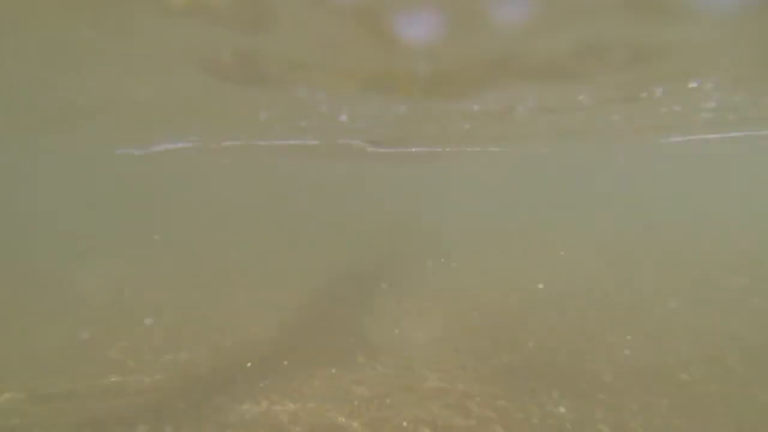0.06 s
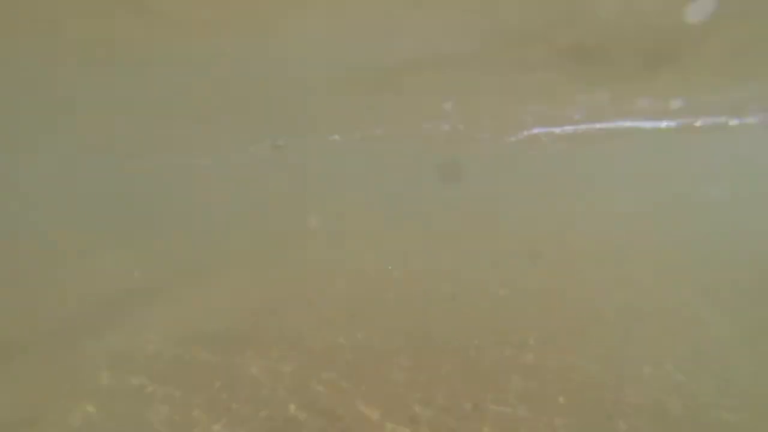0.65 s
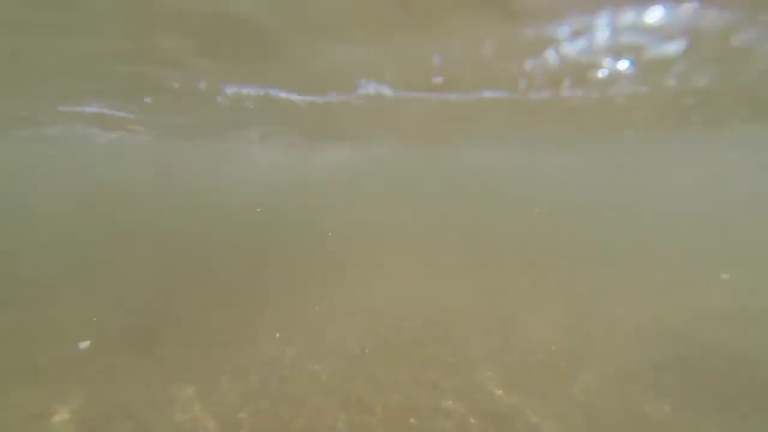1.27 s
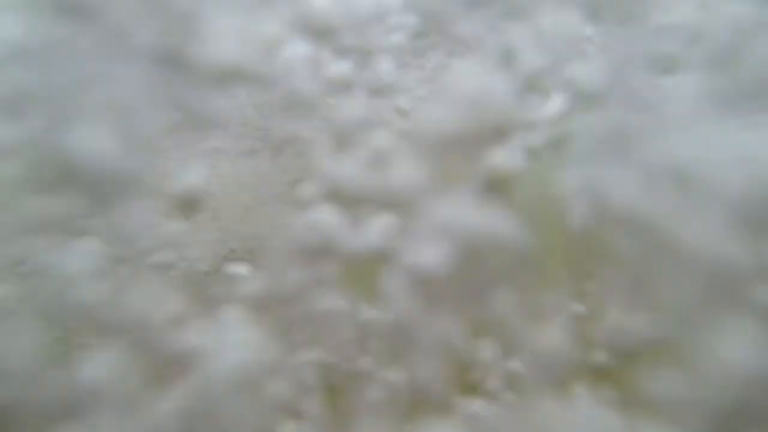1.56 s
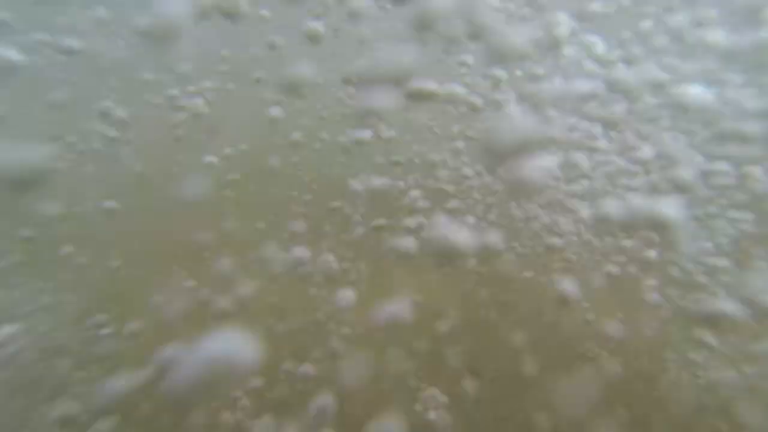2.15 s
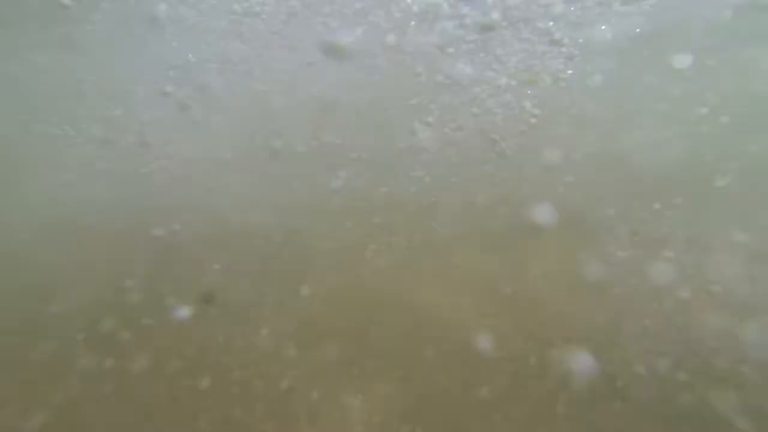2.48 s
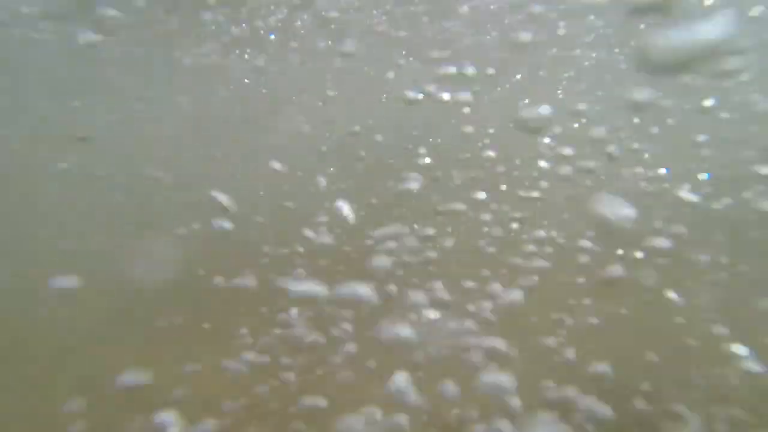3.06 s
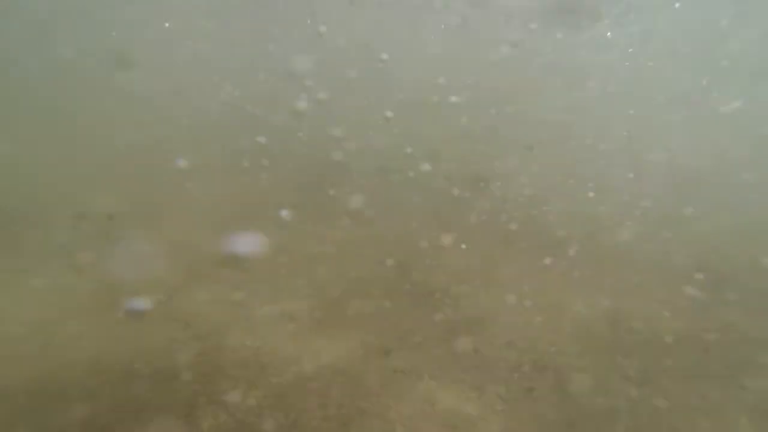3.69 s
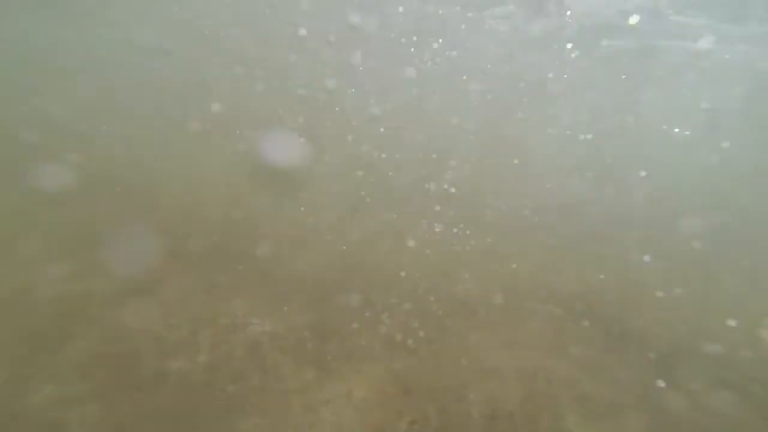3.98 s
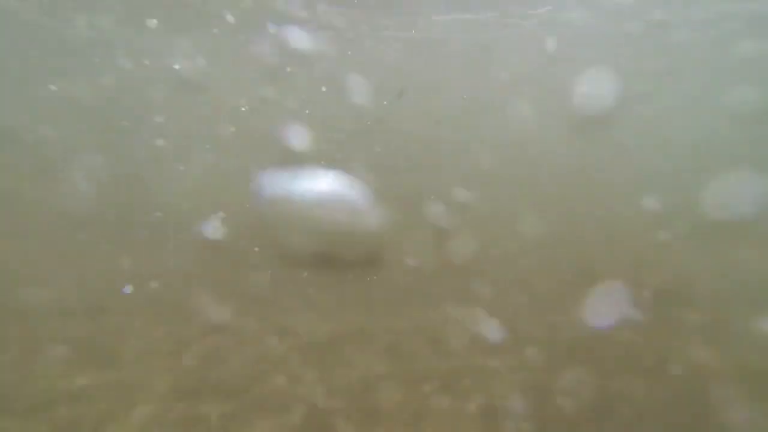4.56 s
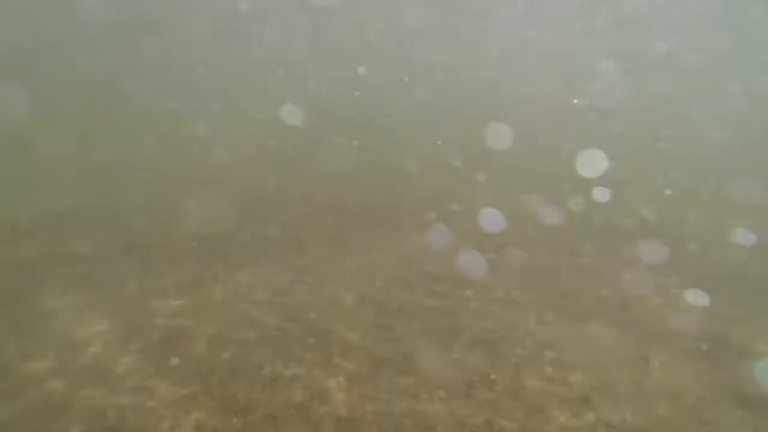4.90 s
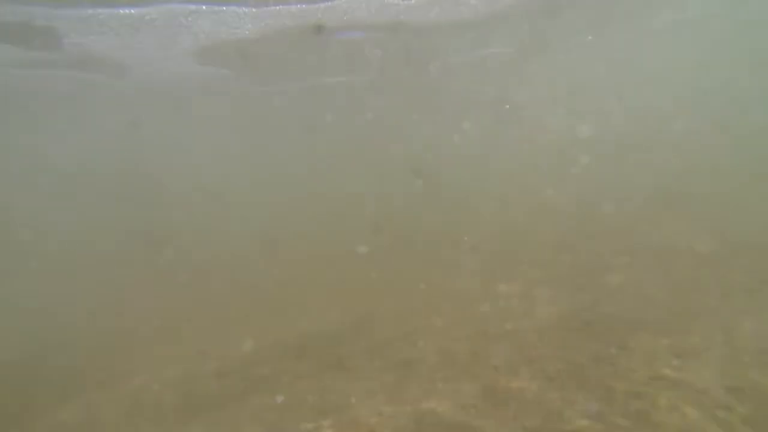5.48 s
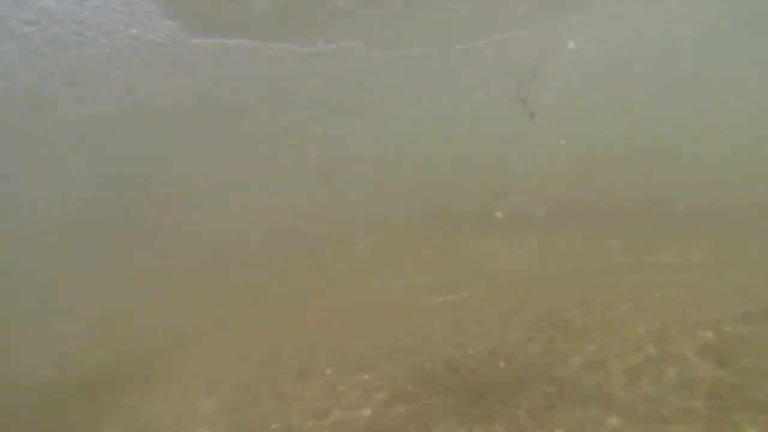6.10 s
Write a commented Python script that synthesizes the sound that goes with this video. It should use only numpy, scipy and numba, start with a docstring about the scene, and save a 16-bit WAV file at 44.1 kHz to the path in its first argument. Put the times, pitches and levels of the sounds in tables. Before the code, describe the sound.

Heard underwater, a small wave slaps down and churns overhead, then thins into scattered bubble pops over a low rumble.

```python
"""A small wave breaks over a microphone case held just under the surface of a shallow sea.
First far surf fizzes, a tiny bubble ticks and the current rumbles on the case, as it does throughout.
At 1.3 s the breaker slaps down, single bubbles ring close by, and it drives in a cloud of air that
booms as a whole. From 2 s the cloud thins and rises in pitch while the pops and ticks grow sparser.
The current shoves again near 5 s, and a brief gritty swish passes just before 6 s."""
import sys
import numpy as np
from scipy import signal
from scipy.fft import rfft, irfft, next_fast_len
from scipy.io import wavfile
from scipy.ndimage import uniform_filter1d
from numba import njit

SR = 44100
rng = np.random.default_rng(int(sys.argv[2]) if len(sys.argv) > 2 else 0)


def inscribe(sig):
    """Save sig as 16-bit PCM at rate SR to the path in sys.argv[1].

    A 1-D sig is mono; a 2-D sig holds one channel per row.
    Samples are clipped to [-1, 1] before scaling.
    """
    pcm = np.round(np.clip(np.atleast_2d(sig).T, -1, 1) * 32767)
    wavfile.write(sys.argv[1], SR, pcm.astype(np.int16))


N = 279594
TIME = np.arange(N) / SR


def undb(db):
    """Decibels to gain."""
    return 10 ** (np.asarray(db) / 20)


def unit(x):
    """Scale to rms 1."""
    return x / np.sqrt(np.mean(x ** 2))


def steady(x):
    """Ride the rms to 1 over each tenth of a second, keeping the fine grain."""
    return x / np.sqrt(np.maximum(uniform_filter1d(x ** 2, SR // 10), 1e-18))


def ramp(start, length):
    """Linear fade from 0 to 1."""
    return np.clip((TIME - start) / length, 0, 1)


def curves(table):
    """One automation lane per column, joined by straight lines in time."""
    times, *columns = np.transpose(table)
    return [np.interp(TIME, times, column) for column in columns]


def colour(x, points):
    """EQ by a curve of (f/Hz, gain/dB) points."""
    hz, db = np.transpose(points)
    size = next_fast_len(N)
    bins_hz = np.maximum(np.fft.rfftfreq(size, 1 / SR), 1)
    gain = undb(np.interp(np.log(bins_hz), np.log(hz), db))
    return irfft(rfft(x, size) * gain, size)[:N]


def drift(rate_hz):
    """Smooth random modulation with rms 1."""
    hold = max(int(SR / rate_hz), 1)
    steps = np.repeat(rng.standard_normal(N // hold + 1), hold)[:N]
    return unit(uniform_filter1d(steps, hold))


@njit
def bandpass(x, hz, width):
    """State-variable band-pass whose centre and width can sweep."""
    y, band, low = np.empty(len(x)), 0., 0.
    for i in range(len(x)):
        g, damping = np.tan(np.pi * hz[i] / SR), width[i] / hz[i]
        v = (band + g * (x[i] + 1e-18 - low)) / (1 + g * (g + damping))
        band, low, y[i] = 2 * v - band, low + 2 * g * v, damping * v
    return y


@njit
def ring(start, hz, t60, gain, rise, glide):
    """Sine pings that swell within `rise` cycles, die away and bend up by the fraction `glide`."""
    y = np.zeros(N)
    for k in range(len(start)):
        first, length = int(start[k] * SR), int(t60[k] * SR)
        for i in range(max(0, min(length, N - first))):
            age, cycles = i / length, hz[k] * i / SR
            swell = 1 - np.exp(-(cycles / rise) ** 2)
            tone = np.sin(2 * np.pi * cycles * (1 + glide * age / 2))
            y[first + i] += gain[k] * swell * np.exp(-6.9 * age) * tone
    return y


# resonances of the case: f/Hz, width/Hz, level/dB
CASE_MODES = [(1552, 130, -2), (3330, 520, 7), (5170, 230, -6), (6500, 200, -4), (8320, 1200, 3)]


def housing(x):
    """The case passes the sound and adds its own short rings."""
    return x + sum(undb(db) * bandpass(x, np.full(N, float(hz)), np.full(N, float(width)))
                   for hz, width, db in CASE_MODES)


# push of the current, with two big shoves: t/s, level/dB
CURRENT_LEVEL = [(0, -45), (.55, -44), (.9, -39.5), (1.28, -37.5), (1.36, -25), (1.5, -18), (1.65, -27.5),
                 (2.06, -28), (2.17, -37.5), (2.9, -37.5), (3.4, -35.5), (3.7, -41), (4.5, -34.5),
                 (4.72, -38.5), (4.93, -29.5), (5.15, -38), (5.65, -42), (6.05, -37), (6.34, -39)]
# its sub-heavy tone: f/Hz, gain/dB
RUMBLE_EQ = [(10, -11), (25, 2), (40, -2), (60, -6.5), (85, -13.5), (130, -21), (200, -27), (400, -40.5),
             (900, -83.5), (3000, -120)]
# thumps of single eddies: t/s, level/dB, f/Hz, t60/s
EDDY_BUMPS = [(0.182, -27.5, 90, 0.077), (.287, -28, 88, 0.075), (.558, -30, 104, .083),
              (0.845, -23.5, 81, .08), (1.029, -25, 84, 0.11), (1.316, -14.5, 85.6, 0.092),
              (2.72, -27.5, 69, .084), (4.998, -6, 29, 0.19), (5.461, -24, 96, .05)]


def current():
    """Eddies buffet the case in uneven low throbs; the strongest bump it."""
    db, = curves(CURRENT_LEVEL)
    throbs = steady(colour(rng.standard_normal(N), RUMBLE_EQ)) * undb(db + 1.6 * drift(20))
    start, bump_db, hz, t60 = np.array(EDDY_BUMPS, float).T.copy()
    return throbs + ring(start, hz, t60, undb(bump_db), rise=.09, glide=0.)


# surf voices: plunge level/dB, attack/s, fade/(dB/s), offset from the wash/dB, brightness weight
BOOM_VOICE = (-24.8, .08, 24.5, -1, -.1)
CHURN_VOICE = (-21.2, .1, 60, -5, .32)
LARGE_VOICE = (-21.2, .01, 40, 0, -.16)
SMALL_VOICE = (-29.5, .06, 78, -10.2, 1.08)
FIZZ_VOICE = (-38.3, .11, 128, -20.3, .92)
# bed of surrounding surf, swelling before the breaker and settling after: t/s, level/dB, brightness/dB
SURF_WASH = [(0, -54, 4.5), (.47, -50, 4.7), (.75, -51, 5), (1.1, -49, 4.5), (1.32, -43.5, 4),
             (2.5, -44, 2.5), (3.15, -49.5, -1.5), (3.4, -47, -1), (3.65, -49.5, -2.5), (4.3, -47, -.5),
             (4.7, -52.5, 2.5), (5.3, -50.5, -.5), (5.8, -56.5, -2), (6.34, -55.5, -.5)]
# pushes of the breaker over the case: t/s, length/s, strength/dB
BREAKER_PLUNGES = [(1.323, 0.042, -5), (1.394, .058, 0.5), (1.655, .17, 0), (1.885, .185, 1.2)]


def surf_level(voice):
    """One voice's fader in dB: each plunge raises it, holds it and lets it sink into the wash."""
    plunge_db, attack, fade, offset_db, bright_weight = voice
    pushes = [ramp(start, attack) * undb(db - fade * np.maximum(TIME - start - length, 0))
              for start, length, db in BREAKER_PLUNGES]
    wash_db, bright_db = curves(SURF_WASH)
    wash = undb(wash_db + offset_db + bright_weight * bright_db + SWISH_DB * swish())
    return 20 * np.log10(np.hypot(undb(plunge_db) * np.max(pushes, axis=0), wash))


# perspective of the bubbles: t/s, share of their power from close by/(0-1)
CLOSE_SHARE = [(0, 0.01), (1.28, 0.15), (1.35, 0.71), (2.2, 0.79), (2.8, 0.81), (4.2, 0.79), (5.5, 0.97),
               (5.9, 0.18), (6.3, 0.47)]


def swarm(eq, low_hz, high_hz, cycles, spread_db, count):
    """One size class of bubbles: near ones ring singly and unequally, far ones merge into a wash."""
    when, pitch, closeness, life = rng.random((count, 4)).T
    hz = low_hz * (high_hz / low_hz) ** pitch
    gain = undb(spread_db * np.minimum(-np.log(1 - closeness), 5))
    grains = ring(when * N / SR, hz, cycles * (.13 + life) / hz, gain, rise=.25, glide=.027)
    near = steady(housing(colour(grains, eq)))
    far = steady(housing(colour(rng.standard_normal(N), eq)))
    share, = curves(CLOSE_SHARE)
    return np.sqrt(share) * near + np.sqrt(1 - share) * far


# tone of the large bubbles, the small ones and the fizz: f/Hz, gain/dB
LARGE_EQ = [(150, -46.5), (350, -12.5), (600, -11), (900, -2.5), (1300, -1.5), (1800, -2), (2300, -18),
            (3200, -36.5), (6000, -83)]
SMALL_EQ = [(500, -59.5), (1400, -26.5), (2100, 7), (2700, -2.5), (3400, -7), (4100, -17.5), (5000, -31),
            (8000, -67)]
FIZZ_EQ = [(1000, -60), (3000, -3), (4200, 4.5), (5500, 1), (7000, -6), (8500, -12.5), (10000, -12),
           (13000, -16), (16000, -23)]


def foam(large_db, small_db, fizz_db):
    """Three size classes of bubbles, all stirred by the same eddies."""
    large = swarm(LARGE_EQ, 445, 2680, cycles=16, spread_db=3, count=9000) * undb(large_db - .83)
    small = swarm(SMALL_EQ, 1700, 5010, cycles=38, spread_db=6.5, count=8000) * undb(small_db + 1.7)
    fizz = swarm(FIZZ_EQ, 3500, 15000, cycles=40, spread_db=6, count=5500) * undb(fizz_db + 2.5)
    near, = curves(CLOSE_SHARE)
    eddies = undb(4.7 * near ** 2 * drift(90))
    return eddies * (large + small + fizz)


def cloud_pitch(clear_hz=766, full_hz=244, settled_hz=593, thin_from_s=2.016, thin_tau_s=1.02):
    """The cloud's resonance dives as air is driven in and recovers as the air rises out."""
    filling = clear_hz + (full_hz - clear_hz) * ramp(start=1.41, length=.115)
    thinned = 1 - np.exp(-np.maximum(TIME - thin_from_s, 0) / thin_tau_s)
    return filling + (settled_hz - full_hz) * thinned


# dark gurgle of the air pockets: f/Hz, gain/dB
CHURN_EQ = [(25, -17.5), (60, -5.5), (90, -3), (160, -0.5), (300, -3), (600, -1.5), (1000, -19),
            (2000, -62), (5000, -110)]


def cloud(boom_db, churn_db):
    """Turbulence shakes the cloud of air like one soft bubble; fist-sized pockets gurgle in it."""
    hz = cloud_pitch() * np.exp(.02 * drift(12))
    near, = curves(CLOSE_SHARE)
    shaking = rng.standard_normal(N) * undb(5 * near * drift(40))
    resonance = bandpass(shaking, hz, .27 * hz)
    boom = steady(bandpass(resonance, hz, 1.64 * hz))
    churn = swarm(CHURN_EQ, 71.4, 896, cycles=12.6, spread_db=4, count=2200)
    surge = undb(1.5 * near * drift(45))
    return surge * (undb(boom_db + 1.83) * boom + undb(churn_db) * churn)


# thin top-end sheen: f/Hz, gain/dB
HISS_EQ = [(2000, -36.5), (4000, -6.5), (5200, 0), (6500, -2.5), (8200, 0), (9500, -7.5), (13000, -10),
           (16000, -20)]


def hiss(level_db=-77):
    """A faint, steady bed of bright noise."""
    return undb(level_db) * unit(colour(rng.standard_normal(N), HISS_EQ))


def strays(voice, bunches, plunge_db, follow, spread_db, low_hz, high_hz):
    """Cues for chance pairs of bubbles drifting past, louder where the foam's voice is louder."""
    from_s, until_s, bunch_s = 1.6, 5.65, .07
    place = ((np.arange(bunches) + rng.random(bunches)) / bunches) ** 1.35  # thickest at first
    lag, strength, pitch = rng.random((bunches * 2, 3)).T
    start = from_s + (until_s - from_s) * np.repeat(place, 2) + bunch_s * lag
    fall_db = np.interp(start, TIME, surf_level(voice)) - voice[0]
    db = plunge_db + follow * fall_db + spread_db * (2 * strength - 1)
    return start, db, low_hz * (high_hz / low_hz) ** pitch


def scatter(x, t60=.03):
    """Surface, sand and neighbouring bubbles send back a quick, uneven tail."""
    age = TIME[:SR // 20]
    tail = rng.standard_normal(len(age)) * np.exp(-np.log(1000) * age / t60) * (age > .001)
    return signal.fftconvolve(x, tail / np.linalg.norm(tail))[:N]


# featured tiny bubbles bursting on the case: t/s, level/dB, f/Hz
TICK_CUES = [(.5036, -41.5, 8350), (1.439, -19, 4000), (1.7411, -17, 5060), (1.8895, -13, 7500),
             (1.921, -13, 4200), (1.9963, -10, 4160), (2.0798, -12, 4240), (2.0966, -8, 8450),
             (2.2265, -20.5, 3400), (2.4878, -32, 12830), (2.5814, -25, 11500), (2.8634, -33, 12100),
             (3.028, -32.5, 5770), (3.3932, -33, 7950), (3.5737, -30, 4960), (4.416, -31.5, 12190),
             (4.5498, -33, 5730), (4.5744, -37, 11220), (4.7867, -30, 5200), (5.18, -36, 4530),
             (5.4779, -32, 7950), (6.0654, -27.5, 3470)]


def ticks(ping_cycles=51, click_cycles=5):
    """Pinhead bubbles ping for a few milliseconds, each with a broad little click."""
    faint = strays(FIZZ_VOICE, 16, plunge_db=-20.5, follow=.74, spread_db=7, low_hz=3900, high_hz=9000)
    start, db, hz = np.vstack([TICK_CUES, np.column_stack(faint)]).T.copy()
    ping = ring(start, hz, ping_cycles / hz, undb(db - 4), rise=1., glide=.04)
    click = ring(start, hz, click_cycles / hz, undb(db), rise=.45, glide=0.)
    return ping + undb(1.5) * housing(click) + undb(-10) * housing(scatter(click))


# sheets of water hitting the case: t/s, level/dB, length/s
SLAP_CUES = [(1.335, -11, 0.024), (1.371, -16.5, 0.0087), (1.414, -23.5, 0.028)]
# their midrange smack: f/Hz, gain/dB
SLAP_EQ = [(200, -31), (800, -1), (1600, 2.5), (2800, 2), (4200, -12.5), (6000, -11), (10000, -30),
           (16000, -34)]


def slaps():
    """The front of the breaker hits the case in a few short, dense bursts."""
    envelope = sum(undb(db) * np.sin(np.pi * ramp(start, length)) for start, db, length in SLAP_CUES)
    return envelope * unit(housing(colour(rng.standard_normal(N), SLAP_EQ)))


def satellites(start, db, hz, t60, lead_s=(.003, .011)):
    """Each close bubble sheds a small one just before it pinches off."""
    lead, size, pitch = rng.random((len(start), 3)).T
    early = start - np.interp(lead, [0, 1], lead_s)
    gain = undb(db - 21) * (.5 + size)
    return ring(early, hz * 1.1 * 2 ** (pitch - .5), t60, gain, rise=.57, glide=.05)


# featured two-part pops; levels and decays are nominal, trimmed per part below:
# t/s, level/dB, f/Hz, decay/s, partner f/Hz, partner offset/dB, snap level/dB
POP_CUES = [(1.3444, -7.5, 2610, .022, 3340, -8.5, -8), (1.3539, -4, 815, 0.017, 1810, -11, -32),
            (1.3703, -4, 1193, .023, 1760, -7, -19), (1.3779, 1.5, 1550, 0.014, 2870, -18, -30),
            (1.4197, -7, 696, 0.027, 1480, -8, -27), (1.446, -5, 620, .03, 1104, -10, -27),
            (1.492, -5, 295, 0.064, 198, -2, -50), (1.517, -9.5, 341, 0.047, 238, 5, -41),
            (1.716, -5, 1370, .015, 820, -23, -16), (1.7488, -7, 1150, .025, 1710, -4, -19),
            (1.7946, -2, 1330, .022, 890, -20, -24), (1.824, -10, 1730, .02, 1230, -9, -24),
            (1.8401, -5.5, 1645, 0.027, 1110, -2, -41), (1.919, -5.5, 1950, .0095, 1490, 1, -15.5),
            (1.9834, -4.5, 2280, 0.009, 1130, -19, -18), (2.033, -4.5, 1400, .02, 925, -23, -21),
            (2.056, -9, 470, .05, 620, -6, -45), (2.0667, -6.5, 3080, 0.011, 1930, -9, -24),
            (2.1056, 0, 1088, .014, 474, 3.5, -38), (2.2033, 0, 1340, .0065, 1980, -10, -41),
            (2.2143, -11.5, 930, .022, 1550, -3, -55), (2.268, -2.5, 1520, .0076, 1020, -6, -30),
            (2.338, -5, 1320, .012, 900, -7.5, -51), (2.369, -11, 1582, 0.027, 1150, -0.5, -60),
            (2.417, -13, 3330, .016, 1630, -1, -60), (2.4478, -15.5, 687, 0.037, 1070, -20, -60),
            (2.4753, -14, 1420, .013, 1100, -1.5, -60), (2.5324, -4, 1196, .016, 1710, -8.5, -14.5),
            (2.5814, -15.5, 1230, 0.036, 524, -1.5, -22), (2.6112, -10.5, 1440, .013, 970, -2, -31),
            (2.8256, -15, 890, 0.032, 1483, -2.5, -51), (2.9917, -26, 1036, 0.023, 1570, -14, -27.5),
            (3.4304, -9, 1390, .011, 740, -3.5, -43), (3.7193, -24.5, 1100, .016, 1440, -5, -60),
            (4.2315, -8.5, 1390, .012, 2970, -3, -17), (4.2593, -9.5, 1490, .012, 1050, -3.5, -24),
            (4.2949, -6, 2235, 0.025, 1670, -16, -42), (4.3136, 3.5, 1295, 0.0094, 1790, -18, -29.5),
            (4.3197, -15.5, 3380, 0.018, 1570, 2, -47), (4.3452, -12, 1000, 0.013, 2690, -8, -42),
            (4.3556, -11, 970, 0.011, 2040, -3.5, -27), (4.3631, -21, 1670, .014, 2070, -1, -36),
            (4.5294, -28, 1450, 0.017, 2710, -4.5, -53), (4.9363, -23, 1010, 0.032, 1570, -5, -37),
            (4.9727, -16.5, 3630, 0.0056, 1720, 1.5, -35), (5.0176, -27, 3000, .015, 1620, 1, -49),
            (5.1553, -13, 1270, .0092, 2270, -7, -58), (5.228, -3.5, 983, .013, 1750, -10.5, -35),
            (5.2968, -22, 3300, 0.02, 1310, -3.5, -49), (5.4779, -12, 1424, .021, 1820, -11, -34),
            (5.487, -10, 1470, 0.019, 3360, -18, -45), (5.4983, -21.5, 2200, .028, 1530, 0, -65),
            (5.5115, -27, 1365, 0.048, 2600, -14, -65), (5.5618, -32.5, 1480, .02, 3220, -18, -50)]


def close_bubbles(snap_tau_s=.0014, copy_delay_s=.0042):
    """Air pinches off with a snap, both parts ring; a faint inverted copy 4 ms later reshapes them."""
    start, db, hz = strays(LARGE_VOICE, 10, plunge_db=-14, follow=.72, spread_db=4,
                           low_hz=1100, high_hz=2300)
    faint = np.column_stack([start, db, hz, 27 / hz, .676 * hz, np.full(len(start), -4.5), db - 15])
    start, db, hz, decay, partner_hz, partner_db, snap_db = np.vstack([POP_CUES, faint]).T.copy()
    main = ring(start, hz, .79 * decay, undb(db + 5), rise=.8, glide=.063)
    partner = ring(start, partner_hz, 1.115 * decay, undb(db + partner_db + 3.5), rise=.8, glide=.051)
    triggers = np.zeros(N)
    triggers[(start * SR).astype(int)] = undb(snap_db)
    snap_envelope = signal.fftconvolve(triggers, np.exp(-TIME[:SR // 50] / snap_tau_s))[:N]
    snap = snap_envelope * unit(colour(rng.standard_normal(N), FIZZ_EQ))
    direct = main + partner + satellites(start, db, hz, decay)
    delayed_copy = np.interp(TIME - copy_delay_s, TIME, direct)
    return direct - undb(-22) * delayed_copy + housing(undb(-7.5) * snap + undb(-14) * scatter(direct))


SWISH_DB = 9  # lift of the wash


def swish(start_s=5.925, length_s=.14, edge_s=.012):
    """A quick gate for the late swish: 0 outside it, 1 within."""
    return ramp(start_s, edge_s) - ramp(start_s + length_s, edge_s)


def grit(level_db=-65.5):
    """A fine, raspy crackle rides on the swish."""
    grains = rng.standard_normal(N) * undb(4.9 * drift(250))
    return undb(level_db) * swish() * unit(colour(grains, HISS_EQ))


def scene():
    """Mono mix of every layer of the scene."""
    air = cloud(surf_level(BOOM_VOICE), surf_level(CHURN_VOICE))
    froth = foam(surf_level(LARGE_VOICE), surf_level(SMALL_VOICE), surf_level(FIZZ_VOICE))
    return (air + froth + slaps() + hiss() + current() + close_bubbles() + ticks() + grit())[None]


def record(dry, top_hz=15400):
    """A soft clip rounds the loudest peaks and a steep low-pass cuts the top."""
    rounded = dry / (1 + dry ** 8) ** (1 / 8)
    return signal.sosfilt(signal.ellip(8, .2, 70, top_hz, fs=SR, output="sos"), rounded)


dry = scene()
out = record(dry)
inscribe(out)
```